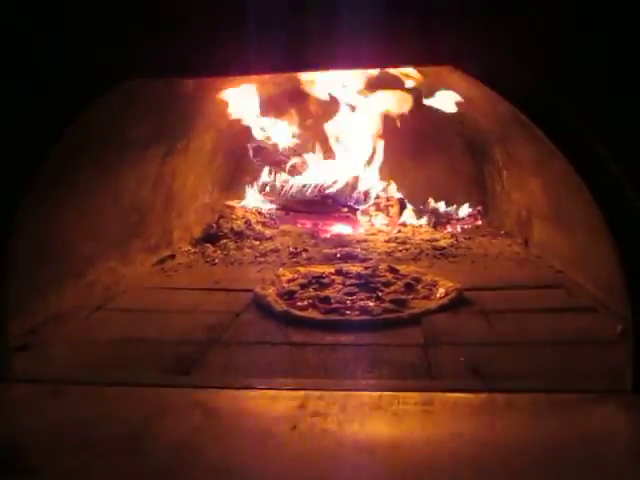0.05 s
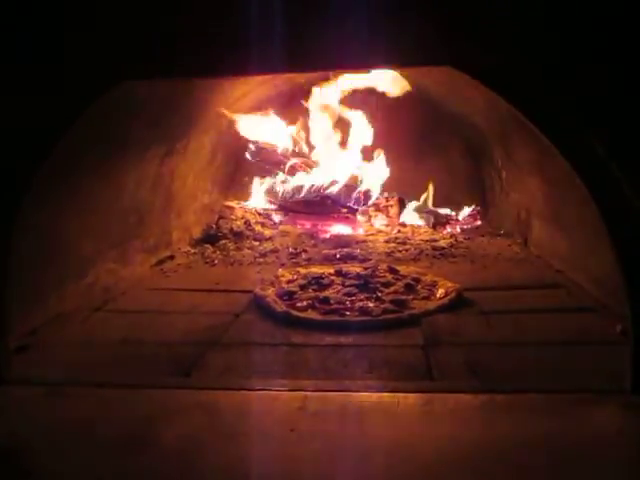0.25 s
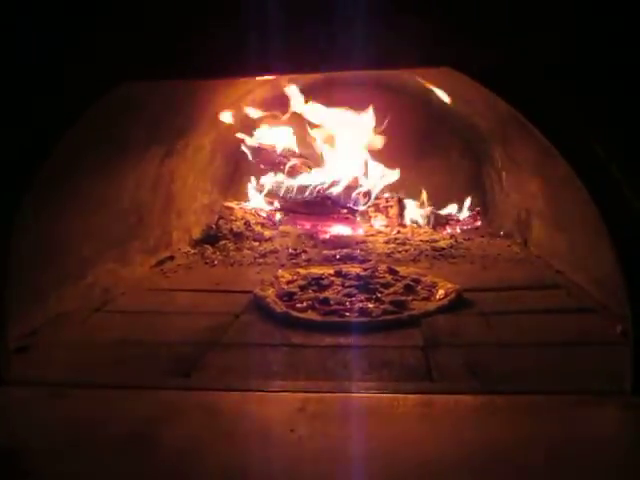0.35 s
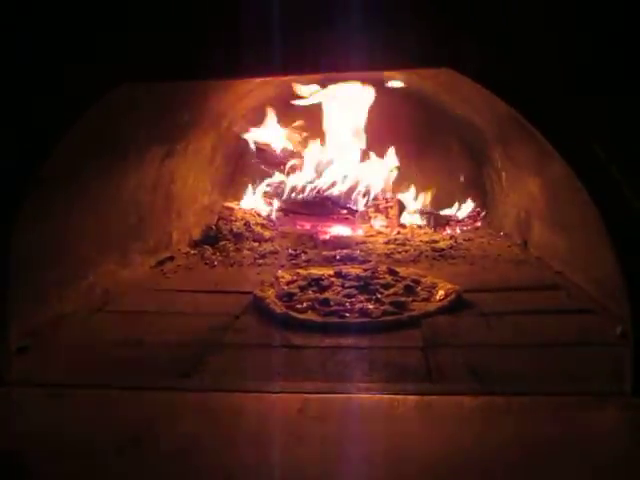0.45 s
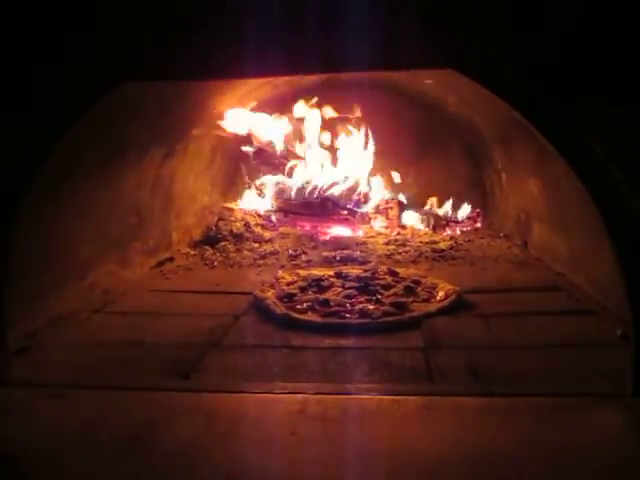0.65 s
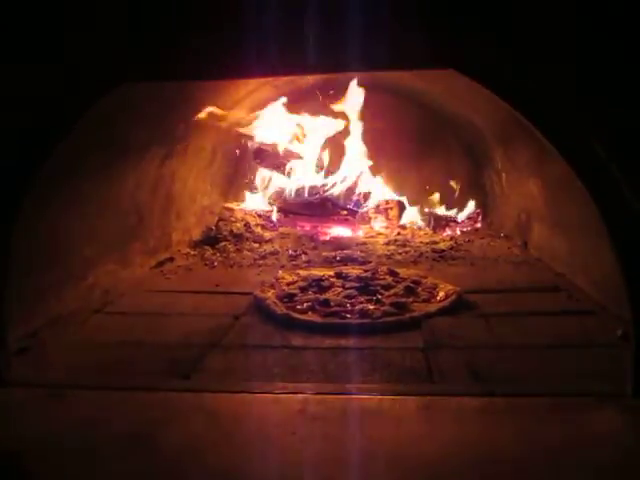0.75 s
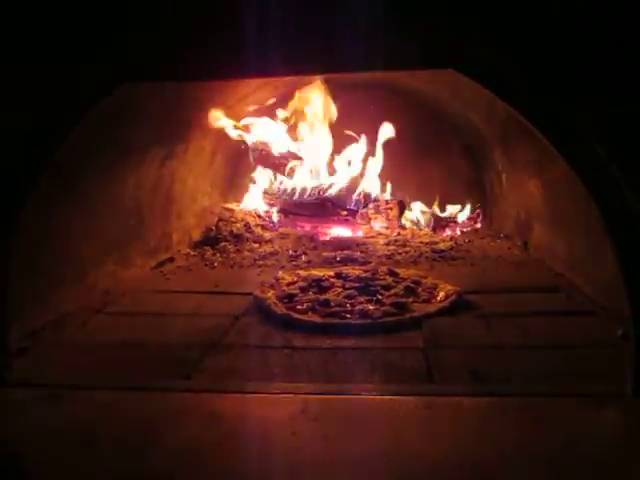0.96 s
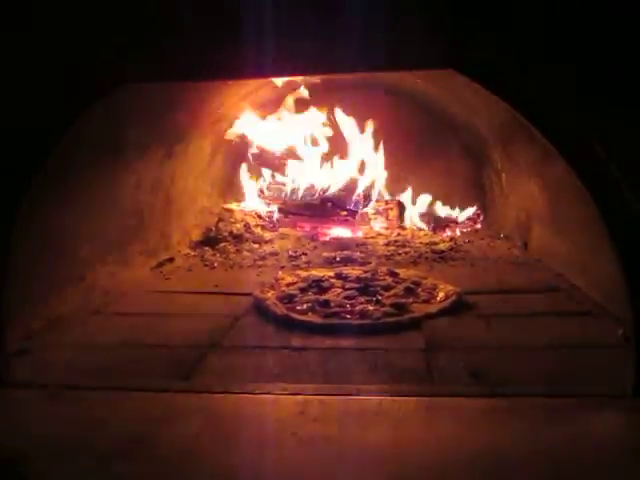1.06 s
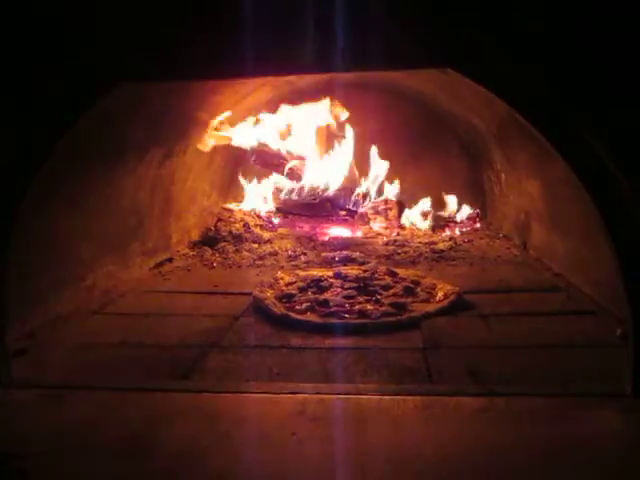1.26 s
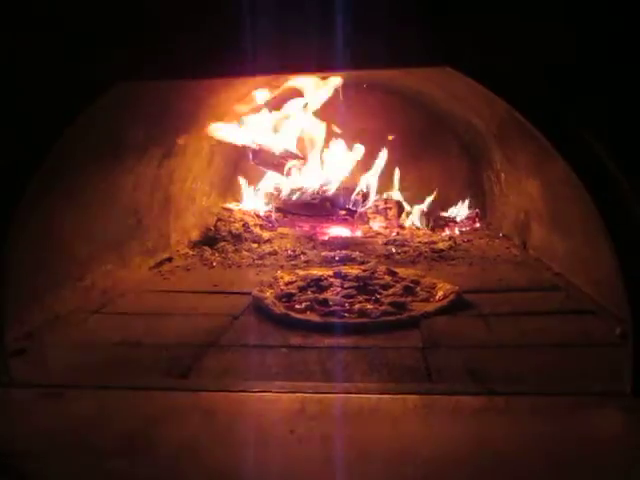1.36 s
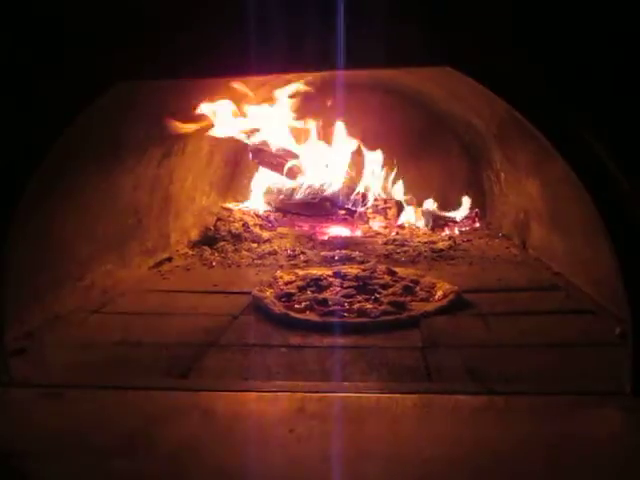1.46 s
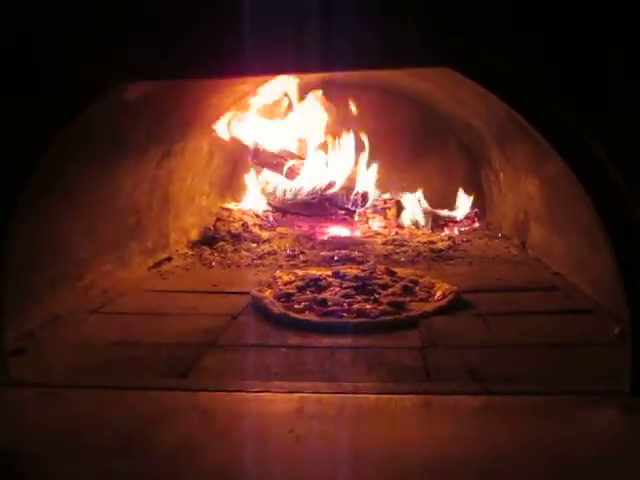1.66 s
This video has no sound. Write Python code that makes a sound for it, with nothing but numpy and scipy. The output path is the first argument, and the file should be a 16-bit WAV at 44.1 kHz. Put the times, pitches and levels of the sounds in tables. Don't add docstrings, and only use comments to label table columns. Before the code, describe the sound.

Wood fire crackling in a domed brick oven, heavier on the left. Faint ticks lead to two distorted loud pops, a dull thumping one at 0.22 s and a brighter one at 0.26. The level dips and slowly recovers. Crisp snaps cluster at 0.48-0.60, another at 0.83, then sparse small crackles until about 1.6. Low fluttering flame roar and soft hiss continue throughout, with short hollow echoes.

```python
import sys
import numpy as np
from scipy import signal
from scipy.io import wavfile
from scipy.ndimage import uniform_filter1d, minimum_filter1d

SR = 44100
rng = np.random.default_rng(int(sys.argv[2]) if len(sys.argv) > 2 else 0)


def volts_from_db(level):
    exponent = np.asarray(level, float) / 20
    return 10 ** exponent


def master_out(mix):
    frames = np.transpose(np.atleast_2d(mix))
    ceiling = np.clip(frames, -1, 1)
    pcm = np.round(ceiling * 32767).astype(np.int16)
    wavfile.write(sys.argv[1], SR, pcm)


N = 74970

# [f/Hz, left over right/dB]
LEAN = [(60, 10.5), (240, 8), (950, 8.0), (3770, 8.5), (15000, 10)]


def bangs():
    bang_times = [.21778, .26293]
    # [level/dB, colour f/Hz, push level/dB]
    loud_pops = [
        (5, 2100, -13),
        (6, 5400, -53),
    ]
    push_ms, rebound_ms, rebound_db = 0.94, 0.5, 0
    ms = np.arange(200) / SR * 1000
    suck = np.sqrt(np.sin(np.pi * np.clip(ms / push_ms, 0, 1)).clip(0))
    rebound = volts_from_db(rebound_db) * np.sin(np.pi * np.clip((ms - push_ms) / rebound_ms, 0, 1))
    crack, push = 0, 0
    for s, (db, hz, push_db) in zip(bang_times, loud_pops):
        burst = click(s, db)
        crack = crack + 1.43 * burst + resonate(burst, hz, hz)
        push = push + click(s, db + push_db)
    push = np.convolve(push, rebound - suck)[:N]
    return through_oven(crack, 0.98) + push * right_gain(-LEAN[0][1])


def pops():
    # [t/s, level/dB, colour f/Hz, sharpness Q]
    small_pops = [(.015, -53, 10000, 2.5), (.067, -37, 10500, 1.2), (.174, -44, 10500, 3),
                  (.186, -43, 6440, 8), (.186, -40, 8700, 9.9), (.4355, -30, 4500, 1.5),
                  (.4356, -28.5, 9000, 1.1), (.45, -40, 8040, 2.8), (.4838, -18.5, 3180, 3.1),
                  (.484, -19.5, 6900, 5.2), (.4842, -26, 1350, 3.3), (.4945, -44, 10000, 1.5),
                  (.5147, -39, 4200, 4), (.5148, -34, 10000, 1.2), (.5665, -30, 5200, 5.7),
                  (.5667, -29, 6600, 5.6), (.5663, -35, 3080, 4), (.589, -16.5, 10500, 1.1),
                  (.5888, -14, 5140, 13), (.5888, -17, 7100, 14), (.589, -24.5, 3400, 6),
                  (.5895, -30, 4850, 53), (.604, -24, 7500, 1.5), (.6042, -26, 5120, 28),
                  (.6655, -38, 4500, 1.3), (.6983, -34.5, 3850, 2.7), (.7635, -36, 6000, 1.3),
                  (.784, -35, 4800, 3), (.7876, -32, 10700, 13), (.8255, -24.5, 7900, 0.72),
                  (.8255, -30.5, 2660, 2.6), (.8275, -38, 3750, 18), (.869, -37, 5500, 1.6),
                  (.944, -37, 8700, 4), (.968, -34, 6500, 1.8), (1.027, -33, 7000, 0.8),
                  (1.067, -26.5, 6270, 8.8), (1.067, -36, 3570, 1.6), (1.183, -41, 9000, 1.2),
                  (1.262, -37, 5400, 2.9), (1.262, -35, 10000, 1.4), (1.287, -42, 9500, 3),
                  (1.428, -35, 11000, 1.1), (1.518, -35, 3920, 1.5), (1.5245, -36.5, 4970, 0.9),
                  (1.5373, -30, 5440, 1.1), (1.553, -36, 14300, 8), (1.5785, -40, 3000, 2.7)]
    place_count, place_spread, broad_db = 6, 0.19, -8
    places = [oven(1 + place_spread * u) for u in rng.uniform(-0.99, 1, place_count)]
    out = np.zeros((2, N))
    for k, (s, db, hz, q) in enumerate(small_pops):
        impulse = click(0, 0)[:SR // 20]
        width_hz = 1.5 * hz / q
        ring = resonate(resonate(impulse, hz, width_hz), hz, width_hz)
        burst = np.sqrt(q) * 3 * ring + volts_from_db(broad_db) * impulse
        burst = burst * volts_from_db(db) / np.sqrt(np.sum(burst ** 2))
        heard = signal.fftconvolve(burst[None], places[k % place_count], axes=1)
        start = int(s * SR)
        out[:, start:start + heard.shape[1]] += heard[:, :N - start]
    return band(out + through_oven(ticks(), 1), 992, 18000)


def ticks():
    per_s, floor_db, spread_db = 150, -57, 2.5
    born = rng.random(N) < per_s / SR
    return born * volts_from_db(floor_db + spread_db * rng.exponential(1, N)) * rng.choice([-1, 1], N)


def through_oven(x, stretch):
    return signal.fftconvolve(x[None], oven(stretch), axes=1)[:, :N]


def oven(stretch):
    # [delay t/ms, level/dB, polarity, right over left/dB]
    arrivals = [(0, -18, -1, 0), (.27, -17, -1, 0), (.6, -16, -1, 0), (.83, 0, 1, 2), (1.02, -4, 1, 0),
                (1.12, -8, 1, 3), (1.23, -5, 1, -4), (1.45, -9, 1, 2), (1.54, -10, 1, -3),
                (1.61, -6, -1, -9), (1.79, -11, 1, 6), (1.84, -4, -1, -6), (2.02, -11, 1, -6),
                (2.18, -7, 1, -6), (2.34, -9, -1, -2), (2.75, -3, -1, -9), (2.97, -9, 1, -1),
                (3.11, -11, 1, -9), (3.65, -13, 1, -6)]
    # [f/Hz, T60 t/s]
    brick_t60 = [(300, 0.085), (1500, 0.056), (5000, 0.061), (9000, 0.037), (14000, 0.0213)]
    # [f/Hz, width f/Hz, level/dB]
    cavity_modes = [(440, 33, -7), (734, 37, 5.5), (954, 40, -3.5), (1460, 350, 7), (3010, 920, 0.5),
                    (4280, 2200, -8), (6080, 660, -2), (9870, 2600, -2.5)]
    dome_start_ms, dome_hold_ms, dome_db, dome_t60_s = .8, 2.2, -27, 0.014
    tail_db, tail_alike = -20, .7
    right_leads_s, pop_lean_db = 4e-5, 8.5
    t = np.arange(SR // 8) / SR
    noise = rng.standard_normal((2, 2, SR // 8))
    noise[:, 1] = tail_alike * noise[:, 0] + np.sqrt(1 - tail_alike ** 2) * noise[:, 1]
    since = t - dome_start_ms / 1000
    fading = np.maximum(since - dome_hold_ms / 1000, 0)
    out = volts_from_db(dome_db - 60 * fading / dome_t60_s) * band(noise[0], 300, 12000)
    for hz in 180 * 2 ** np.arange(0, 6.6, .5):
        decay = volts_from_db(tail_db - 60 * t / at_hz(brick_t60, hz))
        out += decay * band(noise[1], hz / 2 ** .25, hz * 2 ** .25)
    out *= since > 0
    side_t = t - np.array([[right_leads_s], [0]])
    for ms, db, sign, right_db in arrivals:
        out += sign * right_gain(right_db) * volts_from_db(db) * np.sinc((side_t - ms * stretch / 1000) * SR - 2)
    out = out + sum(volts_from_db(db) * resonate(out, hz, width) for hz, width, db in cavity_modes)
    out = signal.sosfilt(signal.butter(1, [636, 15300], "band", fs=SR, output="sos"), out)
    return out * right_gain(-pop_lean_db)


def draught():
    # [t/s, level/dB]
    flare = [(0.0, -65), (0.036, -43), (0.126, -45.5), (0.216, -41), (0.264, -42.5), (0.378, -46),
             (0.415, -37), (0.444, -48.5), (0.6, -41.5), (0.628, -46.5), (1.282, -42.5), (1.32, -50.5),
             (1.42, -37), (1.452, -42), (1.482, -37.5), (1.552, -54), (1.576, -42.5), (1.7, -51)]
    mouth_hz, width_hz, evenness, level_db = 72, 50, .6, 4.5
    hum = resonate(resonate(rng.standard_normal(N + SR), mouth_hz, width_hz), mouth_hz, width_hz)
    power = uniform_filter1d(hum ** 2, size=SR // 40)
    hum = band(hum / power ** (evenness / 2), 40, 110)[SR:]
    flare_db = np.interp(np.arange(N) / SR, *np.transpose(flare))
    return volts_from_db(level_db + flare_db) * rms_one(hum) * right_gain(-LEAN[0][1])


def roar():
    # [f/Hz, density level/dB per Hz]
    roar_spectrum = [(22, -22), (45, -9.5), (70, -11.5), (90, -12.5), (115, -11.5), (250, -17.5),
                     (600, -24), (1500, -29.5)]
    return volts_from_db(-45.5) * flame_noise(roar_spectrum, 0.5, 20 * 2 ** np.arange(0, 6.4, 1 / 3))


def hiss():
    # [f/Hz, density level/dB per Hz]
    hiss_spectrum = [(880, -31), (1500, -6), (2020, -3), (4690, -5), (5830, -6), (7030, -7.5), (9950, -9.5),
                     (16000, -20)]
    return volts_from_db(-55.5) * flame_noise(hiss_spectrum, 1.9, 20 * 2 ** np.arange(19 / 3, 10.1, 1 / 3))


def flame_noise(spectrum, patchy_db, edges):
    # [f/Hz, likeness 0-1]
    likeness = [(60, 0.92), (180, 0.85), (550, 0.3), (1650, 0.07), (4970, 0.057), (15000, 0.031)]
    together = drift(2.16)
    white = rng.standard_normal((2, 2, N + SR))
    out = 0
    for k, (low, high) in enumerate(zip(edges, edges[1:])):
        left, other = band(white[k % 2], low, high)[:, SR:]
        hz = np.sqrt(low * high)
        alike = np.sqrt(np.clip(at_hz(likeness, hz), 0, 1))
        right = volts_from_db(-at_hz(LEAN, hz)) * (alike * left + np.sqrt(1 - alike ** 2) * other)
        gain = volts_from_db(at_hz(spectrum, hz) + patchy_db * (0.5 * together + drift(43)))
        out = out + gain * np.array([left, right])
    return out / np.std(out.mean(axis=0))


def drift(rate_hz):
    r = np.exp(-80 * np.pi * rate_hz / SR)
    slow = signal.lfilter([1], [1, -2 * r, r * r], rng.standard_normal(N // 40 + 2002))[2000:]
    return np.interp(np.arange(N) / 40, np.arange(len(slow)), rms_one(slow))


def click(s, db):
    x = np.full(N, 1e-18)
    x[int(s * SR)] = volts_from_db(db)
    return x


def resonate(x, hz, width_hz):
    r = np.exp(-np.pi * width_hz / SR)
    poles = [1, -2 * r * np.cos(2 * np.pi * hz / SR), r * r]
    return signal.lfilter([(1 - r * r) / 2, 0, (r * r - 1) / 2], poles, x)


def band(x, low_hz, high_hz):
    return signal.sosfilt(signal.butter(2, [low_hz, high_hz], "band", fs=SR, output="sos"), x)


def right_gain(db):
    return volts_from_db(np.array([[0], [db]]))


def rms_one(x):
    return x / np.sqrt(np.mean(x ** 2) + 1e-20)


def at_hz(points, hz):
    table_hz, values = np.transpose(points)
    return np.interp(np.log(hz), np.log(table_hz), values)


def scene():
    return bangs() + pops() + draught() + roar() + hiss()


def low_pass(x):
    return signal.sosfilt(signal.butter(12, 16220, fs=SR, output="sos"), x)


def record(dry):
    # [f/Hz, width f/Hz, depth level/dB]
    housing_notches = [(5900, 480, -3), (7870, 144, -24.5)]
    threshold_db, slope = -17, 0.42
    attack_s, hold_s, release_s = 0.026, 0.11, 0.43
    x, t = dry, np.arange(N) / SR
    for hz, width, db in housing_notches:
        x = x - (1 - volts_from_db(db)) * resonate(x, hz, width)
    peak_db = 20 * np.log10(np.abs(x).max(axis=0) + 1e-9)
    over = np.maximum(peak_db - threshold_db, 1e-3) * slope
    hold = int(hold_s * SR)
    held = -minimum_filter1d(-over, hold, origin=(hold - 1) // 2)
    cut = np.exp(np.maximum.accumulate(np.log(held) + t / release_s) - t / release_s)
    r = np.exp(-1 / (attack_s * SR))
    smooth_cut = signal.lfilter([1 - r], [1, -r], cut)
    x = np.clip(x * volts_from_db(-smooth_cut), -1, 1)
    x = signal.sosfilt(signal.cheby2(18, 30, 16220, fs=SR, output="sos"), x)
    return low_pass(x)


dry = scene()
out = record(dry)
master_out(out)
```